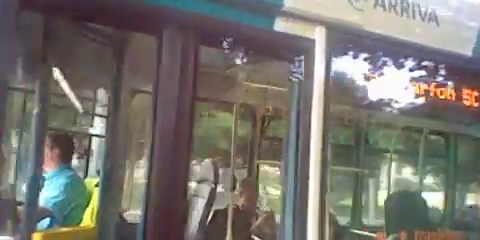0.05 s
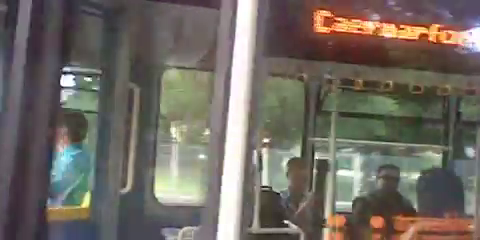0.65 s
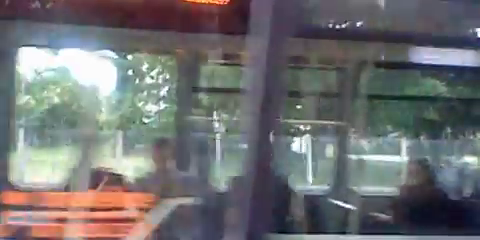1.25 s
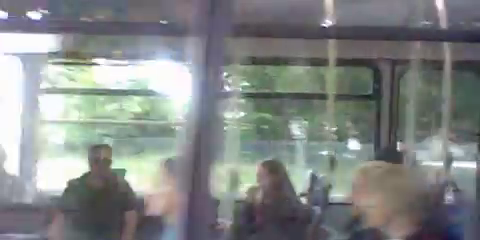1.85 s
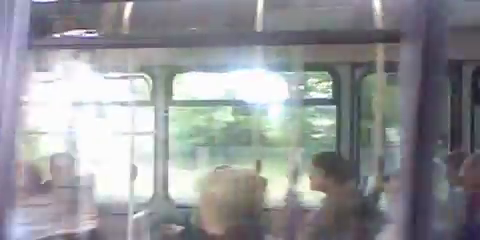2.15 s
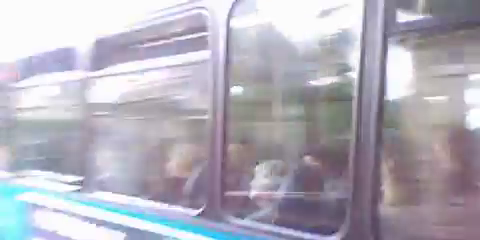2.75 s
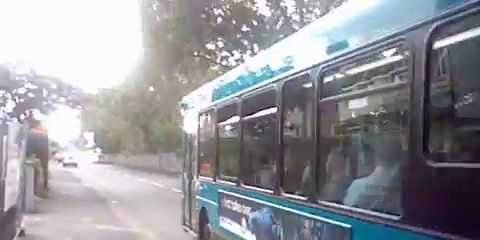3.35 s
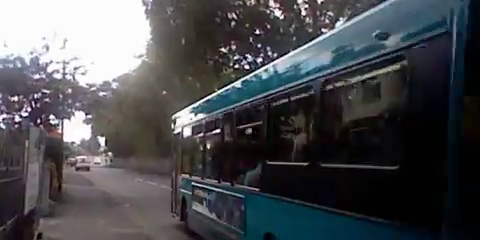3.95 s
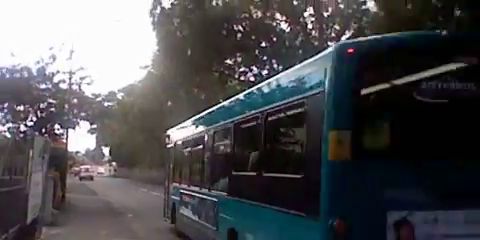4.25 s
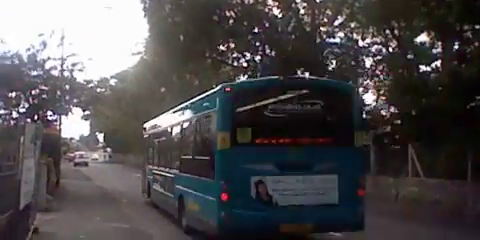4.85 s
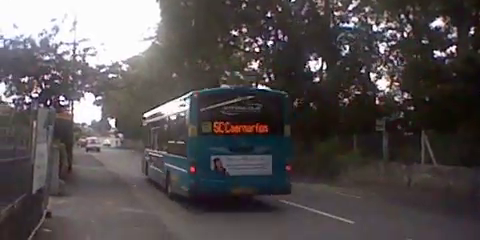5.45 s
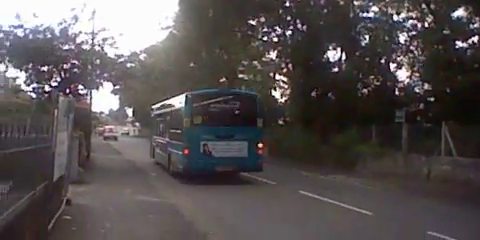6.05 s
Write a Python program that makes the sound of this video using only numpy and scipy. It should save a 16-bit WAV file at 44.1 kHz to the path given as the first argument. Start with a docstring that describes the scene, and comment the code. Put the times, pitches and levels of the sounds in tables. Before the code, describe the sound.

From the start, a diesel bus is approaching and revving up, its exhaust booming over the engine's growl and clatter. Around 1 second, an air valve gives a few dry clicks and one short spit. The engine pitch keeps climbing, joined by a thin turbo whistle and, from about 2 seconds, a gear whine, while tyre roar and airy hiss build. Near 3.9 seconds the bus passes at arm's length. Low gusts buffet the small microphone, mostly between 3 and 5 seconds, and it just overloads at the loudest peaks. As the tail goes by, the revs drop with a strong exhaust boom, and the next gear bites at about 4.6 seconds with a slight wobble. The lower engine note, clatter and tyre noise then fade as the bus draws away, until about 6 seconds.

```python
"""A six-cylinder diesel bus approaches, revving up: the exhaust booms over the block's growl and clatter.
Near 1 s an air valve clicks and spits once under the body. The turbo whistle climbs, gears whine and
tyre roar builds. Near 3.9 s the bus passes at arm's length; gusts buffet a small microphone, which just
overloads. As the tail goes by the revs drop into the next gear, which bites at 4.6 s; the bus leaves."""
import sys
import numpy as np
from scipy import signal
from scipy.fft import rfft, irfft, next_fast_len
from scipy.io import wavfile
from scipy.ndimage import uniform_filter1d, map_coordinates

SR = 44100
rng = np.random.default_rng(int(sys.argv[2]) if len(sys.argv) > 2 else 0)


def put_to_file(sound):
    """Save the sound as 16-bit audio at rate SR, in the file named by the first command-line argument."""
    columns = np.atleast_2d(sound).T  # one column per channel
    safe = np.clip(columns, -1, 1)
    whole_steps = np.round(safe * 32767)
    wavfile.write(sys.argv[1], SR, whole_steps.astype(np.int16))


N = 273861
T = np.arange(N) / SR


def engine_speed(bite_s=4.59, surge_rps=.82, period_s=.35, decay_s=.8):
    """Crank turns per second: climb, gear change, then a driveline surge as the new gear bites."""
    # Each row: time in s, crank speed in turns per s.
    revs = [(0.0, 17.12), (0.42, 20.96), (0.8, 22.23), (1.6, 24.32), (2.5, 27.08), (3.05, 29.17),
            (3.74, 31.38), (3.92, 29.7), (4.2, 23.17), (4.58, 16.68), (4.85, 17.39), (5.8, 17.65),
            (6.21, 21.04)]
    since_s = np.maximum(T - bite_s, 0)
    surge = surge_rps * np.sin(2 * np.pi * since_s / period_s) * np.exp(-since_s / decay_s)
    return (curves(revs)[0] - surge) * (1 + .0025 * drift(40))


def exhaust(turns):
    """Three firings a turn boom from the pipe; the second order makes them throb once a turn."""
    # Each row: time in s, level in dB at the firing rate.
    boom = [(0, -20), (.17, -16), (.6, -18.9), (1.5, -14), (1.82, -16.8), (2.12, -33), (2.45, -16.3),
            (3.35, -13.8), (3.98, -14.2), (4.12, -10.3), (4.23, -13), (4.35, -8), (4.64, -15.3),
            (4.86, -13.8), (5.1, -20), (5.7, -28.5), (6.08, -31), (6.21, -46)]
    # Each row: time in s, level in dB an octave higher.
    boom_octave = [(0, -33), (.35, -37), (1.2, -23.5), (1.55, -25), (1.75, -32), (1.95, -24), (2.48, -23.5),
                   (2.75, -33), (3, -26), (3.5, -37), (4.25, -25.5), (4.9, -23.5), (5.45, -30), (6.05, -52)]
    angle = 2 * np.pi * turns
    firing = amp(curves(boom)[0] + .5 * drift(18)) * np.cos(3 * angle)
    octave = amp(curves(boom_octave)[0] + 1.9 * drift(18)) * np.cos(6 * angle)
    throb = amp(pass_db("throb") + load_db() + 1.3 * drift(14)) * np.cos(2 * angle)
    return -np.sqrt(2) * (firing + octave + throb)


def block(speed_rps, turns, rumble_db=-3):
    """The block shakes at whole and half orders, heard through body panels that ring and rumble."""
    # Each row: frequency in Hz, relative level in dB.
    spectrum = [(25, -15.5), (50, 4.5), (75, 2), (115, -1.5), (170, -2.5), (250, -1), (340, -0.5),
                (420, -4), (560, -17), (1000, -57)]
    # Each row: multiple of crank speed, relative level in dB.
    block_orders = [(1, -10.5), (1.5, -15), (2.5, -14), (3.5, -16.5), (4, -8), (4.5, -9.5), (5, -10.5),
                    (5.5, -14), (7, -12), (7.5, -11), (8, -14.5), (9, -14.5), (10, -14.5), (10.5, -22.5),
                    (11, -18), (12, -14), (13, -19.5), (14, -13.5), (15, -15), (16, -15.5), (17, -20.5),
                    (18, -23.5)]
    hum_orders = [(4, -1), (4.5, -3), (5, -3), (5.5, -4), (7, -1), (12, 0), (13, -8)]  # set the panels humming
    bay_orders = [(4.5, 2), (7.5, 4), (8, 5), (10, 0), (11, 0), (13, 4), (36, -5), (37, -5), (100, -6),
                  (143.5, -4.5)]  # escape the engine bay with the clatter
    level_db = pass_db("block")
    hum_gain, bay_gain = amp(pass_db("hum") + load_db()), amp(pass_db("clatter"))
    power = {}
    for order, db in block_orders:
        power[order] = amp(level_db + db + spectrum_db(spectrum, order * speed_rps)) ** 2
    for orders, gain in (hum_orders, hum_gain), (bay_orders, bay_gain):
        for order, db in orders:
            power[order] = power.get(order, 0) + (gain * amp(db) * panel_gain(order * speed_rps)) ** 2
    lines = sum(np.sqrt(p) * order_line(turns, order) for order, p in power.items())
    return lines + amp(level_db + rumble_db) * colour(noise(), spectrum)


def order_line(turns, order, flutter=.32):
    """One unsteady crank order, random phase, rms about 1."""
    return np.sqrt(2) * (1 + flutter * drift(9)) * np.sin(2 * np.pi * (order * turns + rng.random()))


def panel_gain(hz, floor_db=-15):
    """Body resonances lift any order sweeping through them."""
    # Each row: centre in Hz, width in Hz, gain in dB.
    modes = [(137, 32, -2), (168, 22, -2), (246, 18, -1), (298, 22, 0), (345, 44, -3), (1035, 50, -4),
             (1145, 40, -5), (2740, 380, -4), (3300, 300, -8)]
    grid_hz = np.arange(SR // 8)
    peaks = sum(amp(db) ** 2 / (1 + (2 * (grid_hz - centre_hz) / width_hz) ** 2) ** 2
                for centre_hz, width_hz, db in modes)
    return np.interp(hz, grid_hz, np.sqrt(amp(floor_db) ** 2 + peaks))


def knocking(turns, repeat, depth):
    """Combustion noise: a share repeats every two turns, and all of it swells at each firing."""
    cycle = rng.standard_normal(2800)
    periodic = np.interp(turns / 2 % 1, np.linspace(0, 1, len(cycle)), cycle)
    blend = np.sqrt(repeat) * unit(periodic) + np.sqrt(1 - repeat) * noise()
    return blend * (1 + depth * np.cos(2 * np.pi * 3 * turns))


def tyres(turns):
    """Tyre roar with some engine pulse in it."""
    # Each row: frequency in Hz, relative level in dB.
    spectrum = [(250, -24), (450, -4), (570, -2), (720, 0), (1050, -2.5), (1250, -6.5), (1500, -8),
                (1800, -11), (2600, -28), (5000, -57.5)]
    gain = amp(pass_db("tyres") + .65 * drift(16))
    return gain * colour(knocking(turns, repeat=.27, depth=.17), spectrum)


def clatter(turns):
    """Diesel clatter: the treble of the combustion noise."""
    # Each row: frequency in Hz, relative level in dB.
    spectrum = [(1000, -35), (1700, -11.5), (2000, -3.5), (2350, -3), (2650, 0.5), (2830, -2), (3080, 0),
                (3400, -6), (4200, -16), (7000, -41.5)]
    gain = amp(pass_db("clatter") + .62 * drift(25))
    return gain * colour(knocking(turns, repeat=.17, depth=.082), spectrum)


def intake():
    """Air hisses through fan and intake."""
    # Each row: frequency in Hz, relative level in dB.
    spectrum = [(2500, -25.5), (3500, -4), (4200, 1), (5200, 1), (6000, -1.5), (6900, -2.5), (7500, -5.5),
                (8100, -10.5), (8500, -21.5), (9000, -35.5)]
    gain = amp(pass_db("air") + .47 * drift(30))
    return gain * colour(noise() * (1 + .15 * drift(700)), spectrum)


def road_echo(x, gain=.25, sweep_hz_per_s=2450, nearest_s=3.9, width_s=.5):
    """The road reflection lags most when the engine is near: a hollow colour sweeps down, then up."""
    lag_s = 1 / (sweep_hz_per_s * np.hypot(T - nearest_s, width_s))
    return (x + gain * np.interp(T - lag_s, T, x)) / np.hypot(1, gain)


def turbo(speed_rps, ref_hz=4975, ref_rps=22.8, coast_hz_per_s=400):
    """The whistle climbs with engine speed and coasts down when the load comes off."""
    driven_hz = ref_hz * (speed_rps / ref_rps) ** 1.1
    coast_hz = coast_hz_per_s * T
    hz = np.maximum.accumulate(driven_hz + coast_hz) - coast_hz  # limits the rate of fall
    return tone(hz, pass_db("turbo") + load_db(), flutter_db=4, waver_hz=30, rate_hz=130)


def gearbox():
    """Gear whine rises with road speed and sinks as the bus draws away."""
    # Each row: time in s, pitch in Hz, level in dB.
    whine = [(1.5, 425, -47), (2, 444, -45), (2.15, 453, -34), (2.55, 464, -34.5), (2.9, 482, -33),
             (3.5, 506, -52), (4.3, 499, -46), (4.5, 473, -34), (4.68, 452, -34), (5.1, 439, -41),
             (5.9, 412, -56)]
    sounding = (T >= whine[0][0]) & (T <= whine[-1][0])
    gate = uniform_filter1d(sounding * 1., size=900)
    return gate * tone(*curves(whine), flutter_db=3.3, waver_hz=3, rate_hz=28)


def whistles():
    """Brief whistles and narrow bands of hiss swell, glide and fade as the bus passes."""
    # Each row: middle in s, half length in s, pitch in Hz, glide in Hz per s, width in Hz, level in dB.
    bands = [(1.8, .75, 620, 70, 90, -48), (1.95, .35, 4750, -1600, 700, -48), (2.7, .28, 696, 85, 40, -35),
             (3.33, .1, 2150, 500, 40, -34.5), (3.37, .22, 1503, 130, 12, -35),
             (3.49, .14, 681, 70, 7, -27.5), (3.62, .17, 5200, 600, 400, -37),
             (4.25, .2, 4680, -2700, 300, -46), (4.65, .48, 2995, -230, 190, -47),
             (4.77, .07, 7985, -450, 400, -51), (4.7, .4, 3800, -115, 300, -47),
             (5.85, .4, 3690, -170, 130, -53), (5.85, .35, 1710, -200, 140, -48),
             (6.02, .34, 4860, -3350, 140, -52.5)]
    out = np.zeros(N)
    for middle_s, half_s, hz, glide_hz_per_s, width_hz, db in bands:
        angle = 2 * np.pi * np.cumsum(hz + glide_hz_per_s * (T - middle_s)) / SR
        band = drift(width_hz) * np.cos(angle) + drift(width_hz) * np.sin(angle)
        out += swell(middle_s, half_s) * amp(db) * band
    return out


def air_valve(spit_s=1.06, spit_db=-42, rise_s=.025, fall_s=.014, click_decay_s=.0009, log_width=.22):
    """Dry clicks and a short spit of air, their top treble softened."""
    # Each row: start in s, peak in dB, centre in Hz.
    clicks = [(.903, -36, 5800), (.986, -28, 6000), (.989, -32, 6200), (1.015, -28, 6800),
              (1.030, -28, 6200), (1.031, -30, 2700), (1.057, -30, 6300), (1.315, -33, 5500)]
    spit = np.exp(-np.maximum((spit_s - T) / rise_s, (T - spit_s) / fall_s))
    out = amp(spit_db) * spit * colour(noise(), [(900, -6), (2600, 11), (7000, 5), (9000, -24)])
    t, hz = np.arange(512) / SR, np.fft.rfftfreq(1024, 1 / SR)
    pad = len(t) // 2
    treble_rolloff = amp(spectrum_db([(7000, 0), (9000, -14)], hz))
    for start_s, db, centre_hz in clicks:
        burst = np.pad(rng.standard_normal(len(t)) * np.exp(-t / click_decay_s), pad)
        band = np.exp(-.5 * (np.log((hz + 1) / centre_hz) / log_width) ** 2)
        click = irfft(rfft(burst) * treble_rolloff * band)
        start = round(start_s * SR) - pad
        out[start:start + len(click)] += amp(db) * click / abs(click).max()
    return out


def draught(breeze_db=-39):
    """A light breeze and gusts pushed by the bus buffet the microphone."""
    # Each row: middle in s, half length in s, level in dB.
    gusts = [(.8, .2, -24), (2.3, .16, -24), (3.25, .55, -24), (4.4, .45, -24)]
    # Each row: frequency in Hz, relative level in dB.
    spectrum = [(3, -16), (11, 3), (25, 12), (40, -9.5), (80, -20.5), (300, -62.5)]
    gain = amp(breeze_db) + sum(amp(db) * swell(middle_s, half_s) for middle_s, half_s, db in gusts)
    return gain * colour(noise(), spectrum)


def pass_db(part):
    """Level of one part: falls with log distance either side of its nearest point."""
    # Each part: peak time in s, peak in dB, approach in dB per doubling of distance, approach width
    # in s, retreat in dB per doubling, retreat width in s.
    passes = { "block": (3.9, -18.0, 7.8, .78, 4.5, .22), "tyres": (3.89, -24.8, 9.8, .95, 3.4, .15),
              "clatter": (3.86, -27.9, 10, .82, 5, .18), "air": (3.89, -29.3, 11, .83, 5.2, .18),
              "throb": (3.7, -17.5, 3, .35, 3.6, .2), "hum": (3.5, -26.2, 3, .55, 5.5, .25),
              "turbo": (4, -48, 5.4, 1, 11, .25)}
    # A part briefly stands out or is screened. Each row: part, middle in s, half length in s, gain in dB.
    exposures = [("clatter", .35, .17, 3), ("clatter", 1.6, .75, -2), ("clatter", 2.68, .18, 2.8),
                 ("clatter", 4.08, .12, 1.3), ("tyres", 2.65, .12, -2.5), ("tyres", 2.95, .16, 2.3),
                 ("air", 3, .25, 1.7), ("block", 2.8, .3, -2.5), ("block", 3.5, .17, 2),
                 ("turbo", 2.35, .25, -9), ("turbo", 3.8, .2, -4), ("throb", 3.35, .12, 2.5)]
    peak_s, peak_db, approach_db, approach_s, retreat_db, retreat_s = passes[part]
    ahead_db = approach_db * np.log2(np.hypot(1, (T - peak_s) / approach_s))
    behind_db = retreat_db * np.log2(np.hypot(1, (T - peak_s) / retreat_s))
    exposed_db = sum(db * swell(s, half_s) for name, s, half_s, db in exposures if name == part)
    return peak_db - np.where(T < peak_s, ahead_db, behind_db) + exposed_db


def load_db(unloaded_db=-10, take_up_s=.5):
    """Hum, throb and turbo start quieter, until the engine takes up its load."""
    return unloaded_db * np.exp(-T / take_up_s)


def tone(hz, db, flutter_db, waver_hz, rate_hz):
    """A gliding sine whose level and pitch shake."""
    cycles = np.cumsum(hz + waver_hz * drift(rate_hz)) / SR
    return amp(db + flutter_db * drift(rate_hz)) * np.sqrt(2) * np.sin(2 * np.pi * cycles)


def drift(rate_hz):
    """Smooth random curve, rms 1."""
    place = np.cumsum(rate_hz * np.ones(N)) / SR
    coarse = map_coordinates(rng.standard_normal(4096), [place[::24]], order=3, mode="wrap")
    return unit(np.interp(T, T[::24], coarse))


def colour(x, spectrum):
    """Filters x by a spectrum; rms 1."""
    size = next_fast_len(N + 4096)
    gain = amp(spectrum_db(spectrum, np.fft.rfftfreq(size, 1 / SR)))
    return unit(irfft(rfft(x, size) * gain, size)[:N])


def spectrum_db(spectrum, hz):
    """Interpolates (Hz, dB) rows over log frequency."""
    knots_hz, db = np.transpose(spectrum)
    return np.interp(np.log(hz + 1), np.log(knots_hz), db)


def curves(rows):
    """Interpolates each column after the time column at every sample."""
    times_s, *columns = np.transpose(rows)
    return [np.interp(T, times_s, column) for column in columns]


def swell(middle_s, half_s):
    """Bell-shaped envelope."""
    return np.exp(-((T - middle_s) / half_s) ** 2)


def noise():
    """White noise."""
    return rng.standard_normal(N)


def amp(db):
    """Decibels to gain."""
    return 10 ** (np.asarray(db) / 20)


def unit(x):
    """Scales to rms 1."""
    return x / np.sqrt(np.mean(x ** 2) + 1e-20)


def scene():
    """One crankshaft drives exhaust, block, clatter and turbo; mono mix."""
    speed_rps = engine_speed()
    turns = np.cumsum(speed_rps) / SR - 1 / 12
    boom = exhaust(turns)
    roar = tyres(turns) + clatter(turns) + road_echo(intake())
    growl = block(speed_rps, turns)
    whine = turbo(speed_rps) + gearbox() + whistles()
    return (boom + growl + roar + whine + air_valve() + draught())[None]


def record(dry, ceiling=.71, cutoff_hz=8800):
    """The microphone clips the loudest peaks, then limits the band."""
    clipped = np.clip(dry, -ceiling, ceiling)
    lowpass = signal.firwin(301, cutoff_hz, window=("kaiser", 8), fs=SR)
    return signal.oaconvolve(clipped, lowpass[None], "same")


dry = scene()
out = record(dry)
put_to_file(out)
```